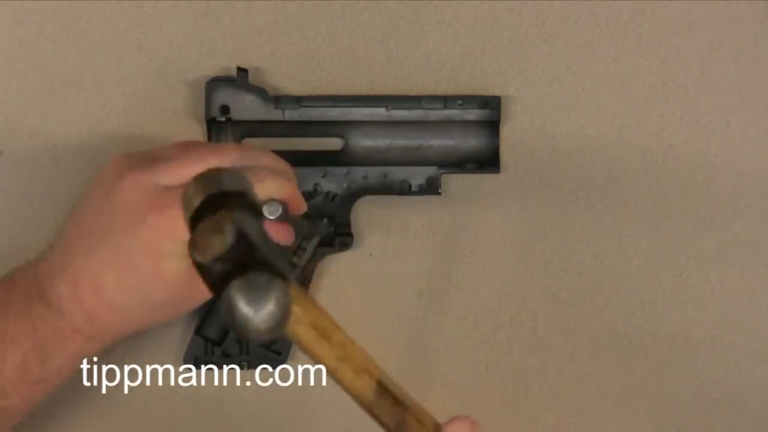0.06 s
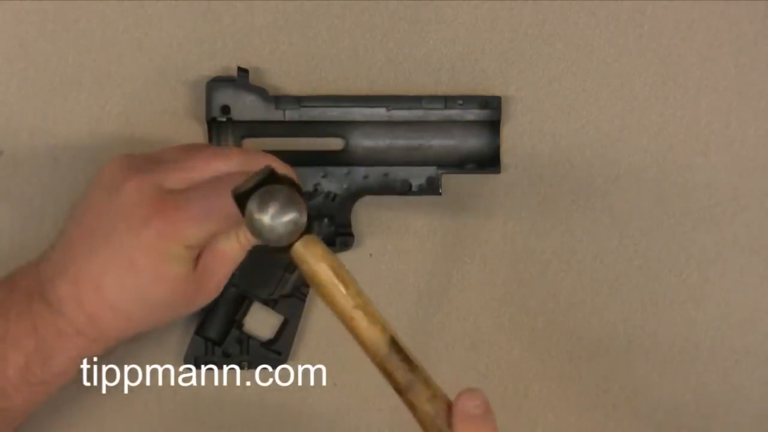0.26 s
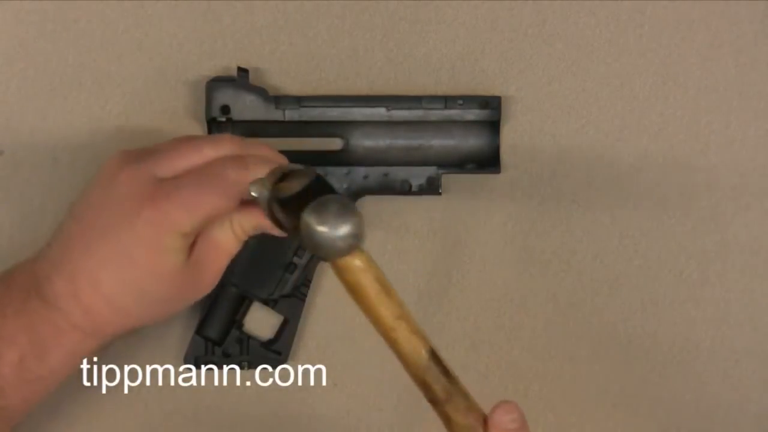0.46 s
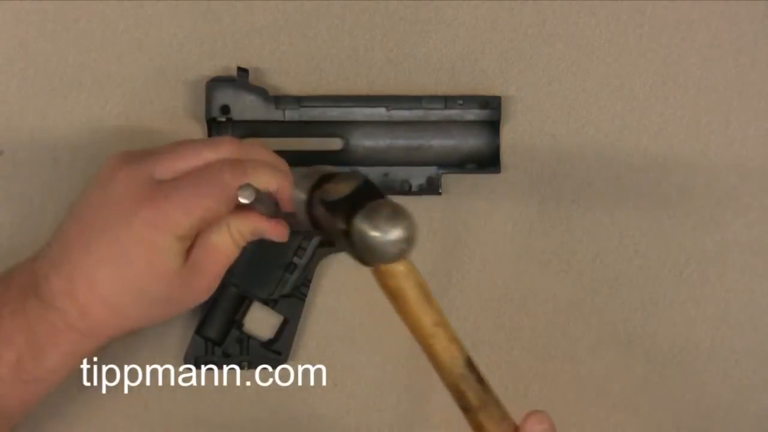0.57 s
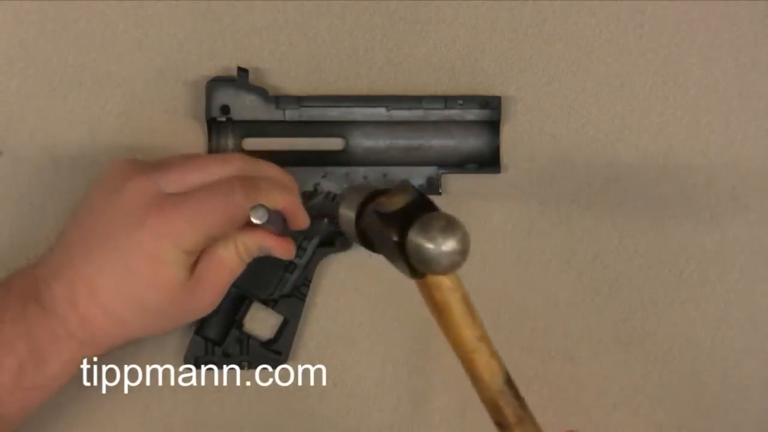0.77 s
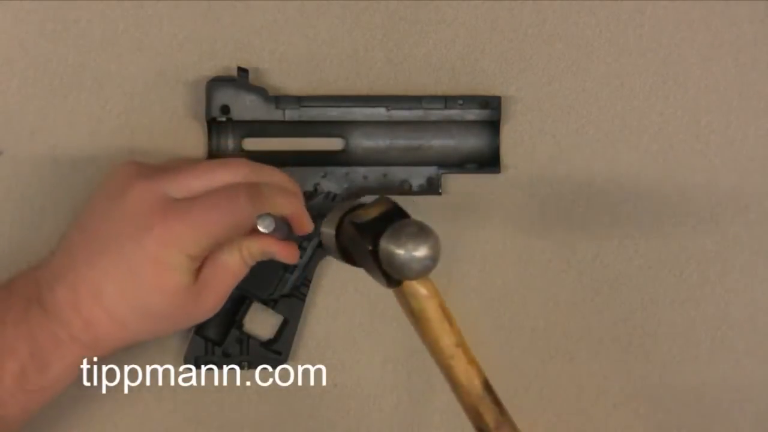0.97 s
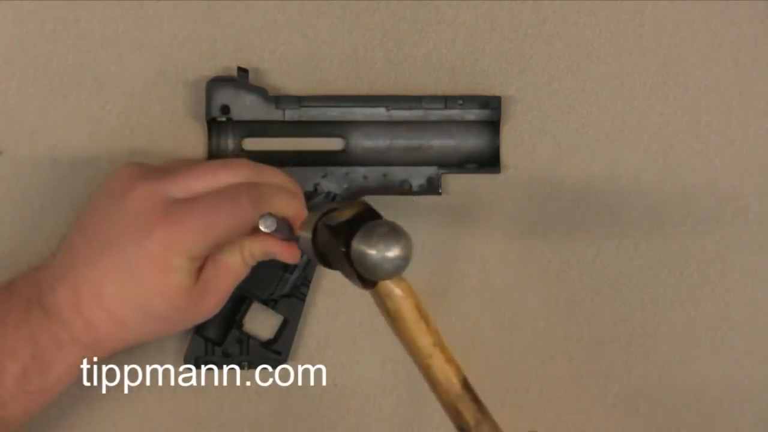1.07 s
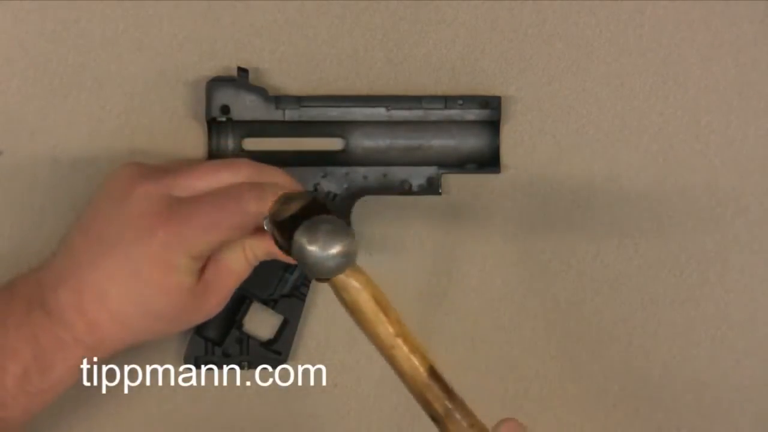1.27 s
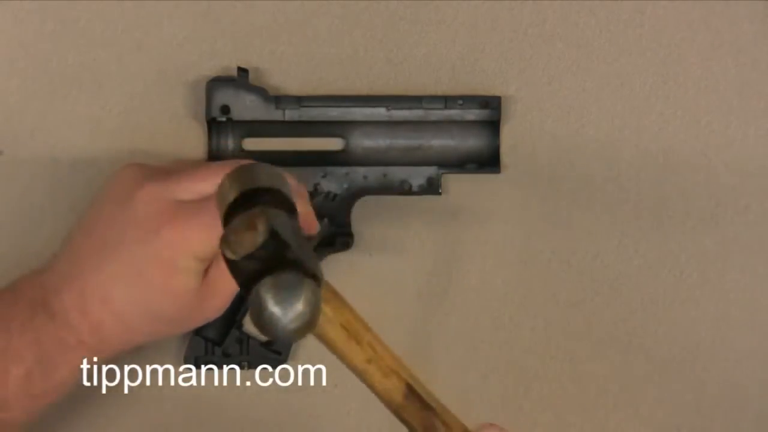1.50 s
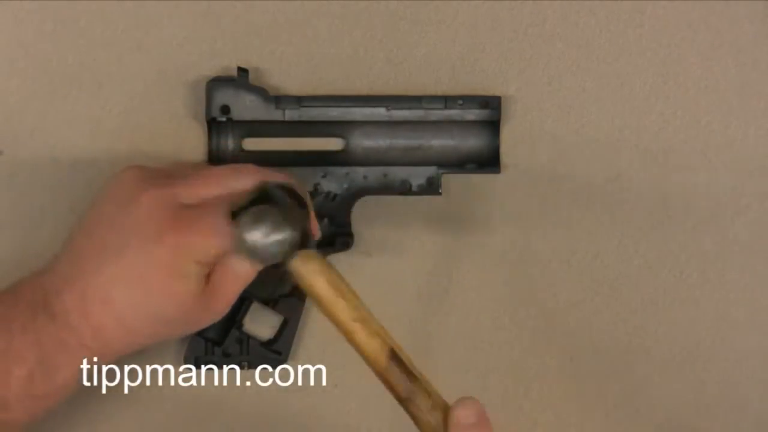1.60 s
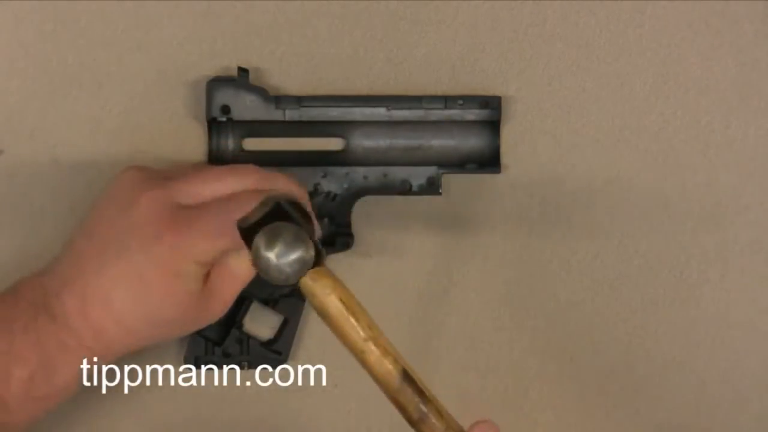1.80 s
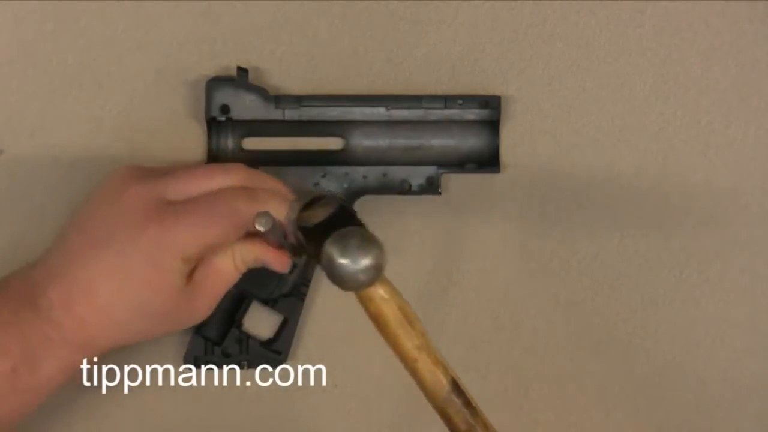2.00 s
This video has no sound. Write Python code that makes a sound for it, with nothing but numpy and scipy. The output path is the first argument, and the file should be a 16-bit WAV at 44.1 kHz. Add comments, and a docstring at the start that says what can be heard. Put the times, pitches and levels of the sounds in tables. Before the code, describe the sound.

Two hard, overloaded hammer blows on a steel punch, with faint knocks between, in a small room

```python
"""Over a steady room tone with wavering hums, a hammer strikes a steel punch on a metal casting on a workbench.
At 0.23 s noisy contact drives the steel modes, and slowly building bench modes and a small room ring on.
The blow overloads the recorder; its gain control cuts late and recovers. Light knocks of damped sines
follow at 0.93, 0.97 and 1.34 s, a second blow at 1.67 s and a last knock, mostly tick, at 1.93 s."""
import sys
import numpy as np
from scipy import signal
from scipy.fft import rfft, irfft
from scipy.io import wavfile
from scipy.ndimage import uniform_filter1d, minimum_filter1d

SR = 44100
rng = np.random.default_rng(int(sys.argv[2]) if len(sys.argv) > 2 else 0)


def materialize(psi):
    """Save the field psi as 16-bit PCM at rate SR to the path in sys.argv[1].

    A 1-D psi becomes a single channel; in a 2-D psi each row is a channel.
    """
    bounded = np.clip(np.atleast_2d(psi).T, -1, 1)
    quanta = np.round(bounded * 32767).astype(np.int16)
    wavfile.write(sys.argv[1], SR, quanta)


N = 90404


def amp(db):
    """Level definition: 20 dB is a factor of ten in amplitude."""
    return 10 ** (np.asarray(db) / 20)


def evened(x):
    """Normalization to unit root-mean-square value."""
    return x / np.sqrt(np.mean(x ** 2) + 1e-20)


def read(points, hz):
    """Linear interpolation of a curve along a logarithmic frequency axis."""
    f, value = np.transpose(points)
    return np.interp(np.log(hz + 1), np.log(f + 1), value)


def add(mix, s, sound):
    """Superposition of a sound on the mix from time s."""
    part = mix[round(s * SR):][:len(sound)]
    part += sound[:len(part)]


def ring(modes, t):
    """Modal superposition: exponentially damped sines from (Hz, dB, t60 s)."""
    return sum(amp(db - 60 * t / t60) * np.sin(2 * np.pi * hz * t) for hz, db, t60 in modes)


def causal(gain):
    """Minimum-phase principle: the Hilbert transform of log gain gives a causal impulse response."""
    log_gain = np.log(np.concatenate([gain, gain[-2:0:-1]]))
    return np.fft.ifft(np.exp(np.conj(signal.hilbert(log_gain)))).real


def pair(size, frames, same_table):
    """Partial coherence: random short-time spectra of two channels sharing a set part of their noise."""
    hz = np.fft.rfftfreq(size, 1 / SR)
    a, b, c, d = rng.standard_normal((frames, len(hz), 4)).T
    same = np.clip(read(same_table, hz), -1, 1)[:, None]
    left = a + 1j * b
    right = same * left + np.sqrt(1 - same ** 2) * (c + 1j * d)
    return hz, np.array([left, right])


# Room-tone spectrum, relative density: frequency_hz [Hz], density_db [dB per Hz]
AIR = [(15, -56), (25, -10.5), (43, -8.5), (121, -7.5), (213, -9), (286, -6), (326, -20.5), (363, -4.5),
       (394, -11.5), (558, -6.5), (856, -16), (11500, -44), (15000, -63.5)]
# Coherence of the room tone: frequency_hz [Hz], left_right_likeness [-1 to 1]
AIR_SAME = [(60, 0.63), (240, 0.05), (950, -0.5), (3770, -0.4), (15000, -0.31)]
# Wavering hums: pitch_hz [Hz], half_width_hz [Hz], level_db [dB]
HUM = [(55.7, 5.8, -64.5), (115, 18, -57), (154, 30, -60), (378, 19, -62)]
AIR_DB, PATCH_DB = -45.5, 1.0  # level of the wash; rms depth of its faint patches


def air():
    """Filtered noise: a broad spectrum gives the wash, narrow resonance curves give wavering hums."""
    def played(z):
        return evened(signal.istft(z, nperseg=4096, noverlap=3072)[1][:, :N])

    hz, z = pair(size=4096, frames=N // 1024 + 5, same_table=AIR_SAME)
    noise = rng.standard_normal(z.shape[:0:-1]).T
    patches = evened(uniform_filter1d(noise, size=30, axis=0))  # smoothed along frequency
    wash = amp(AIR_DB) * played(z * amp(read(AIR, hz)[:, None] + PATCH_DB * patches))
    for pitch, width, db in HUM:
        resonance = 1 / (1 + ((hz - pitch) / width) ** 2)[:, None]
        wash += amp(db) * played(z * resonance)
    return wash


LEAD_S = .005  # room for the contact noise to swell before the blow's start time
CRACK_T60 = .014  # s


def contact(rise, hold):
    """Impact excitation: noise grows exponentially, holds, then decays; gives mid and side parts."""
    u = np.arange(2048) / SR - LEAD_S
    growth = np.exp(np.minimum(u, 0) / rise)
    decay = amp(-60 * np.maximum(u - hold, 0) / CRACK_T60)
    return growth * decay * rng.standard_normal((2, 2048))


# Rattle of the contact, relative density: frequency_hz [Hz], density_db [dB per Hz]
CRACK = [(59, -40), (100, -17), (522, -5.5), (1170, -9.5), (3440, -8.5), (3820, -1), (4530, -11.5),
         (10100, -14), (15800, -33.5)]


def rattle(bright_db):
    """Linear filtering: an impulse response colours the contact noise, tilted towards the treble or bass."""
    hz = np.fft.rfftfreq(2048, 1 / SR)
    return evened(causal(amp(read(CRACK, hz) + bright_db * np.log2(1 + hz / 2000))))


# Modes of punch and casting: pitch_hz [Hz]
STEEL_HZ = [360, 510, 630, 980, 1390, 1570, 1880, 2360, 2640, 3000, 3780, 4740, 5760, 6270, 8100, 8750,
            9810]
# For each of them, relative levels: t60_s [s], first_blow_db [dB], second_blow_db [dB]
STEEL = [(.02, -14, -6.5), (.015, -12.5, -14), (0.0061, -8, -28), (0.026, -6.5, -27.5),
         (0.023, -10.5, -11.5), (.02, -12.5, -36), (0.045, -7, -8), (0.0068, -15, -1),
         (0.045, -13.5, -13.5), (0.026, -5.5, -7), (0.0077, -7, -40), (0.008, -5, -42), (0.002, -23, 7.5),
         (0.011, -1.5, -25), (.01, 0.5, -13.5), (.01, -10.5, -29), (0.029, -24, -1.5)]


def steel(index):
    """Modal response: the impulse response of punch and casting is a sum of damped sines."""
    t = np.arange(2048) / SR
    return evened(ring([(f, m[1 + index], m[0]) for f, m in zip(STEEL_HZ, STEEL)], t))


# Modes of the bench and things on it: pitch_hz [Hz]
BENCH_HZ = [81, 117, 188, 227, 255, 301, 347, 400, 460, 505, 560, 625, 1227, 1490, 1586, 1836, 1886, 1913,
            1951, 1990, 1680, 2035, 2242, 2363, 2487, 2929, 3408, 3736, 3881, 4037, 4304, 4650, 5690, 6008,
            8015, 9733]
# For each of them, relative levels: t60_s [s], first_blow_db [dB], second_blow_db [dB]
BENCH = [(0.64, -12, -11), (0.56, -5.5, -3.5), (0.6, -2, 3), (0.58, -5.5, -8), (0.13, -12.5, -8),
         (0.27, -13.5, -1), (0.44, -0.5, -6.5), (0.64, -9.5, -12), (.3, -8.5, -35.5), (.25, -11, -32.5),
         (0.51, -7, -15), (0.13, -5.5, -22), (0.62, -38, -14), (0.9, -26, -44.5), (0.83, -25.5, -14.5),
         (.7, -25.5, -19), (.7, -21, -17), (0.9, -18.5, -18), (.65, -21.5, -19.5), (.55, -26.5, -27.5),
         (.6, -34, -32), (.6, -31, -13), (.6, -27, -15), (0.48, -28.5, -16), (.6, -32.5, -25),
         (.6, -32, -27), (.6, -32.5, -34), (0.69, -30, -39.5), (0.51, -34.5, -36), (.6, -21.5, -39),
         (0.54, -30, -35), (.55, -35.5, -27), (.6, -41.5, -25), (0.55, -36, -40), (.45, -44, -28.5),
         (0.63, -44.5, -34.5)]
BENCH_RISE_CYCLES = 9.4  # time constant of the build-up
BENCH_WAVER, BENCH_SPREAD = 0.47, 0.27  # depth of each mode's swell: shared, and opposite left and right
BENCH_SHIMMER = .7  # depth of the quick flutter of the metal modes above 1 kHz


def bench(index):
    """Modal decay: modes build up over some cycles and die with random swells; gives left and right."""
    t = np.arange(SR) / SR
    shared, unlike = signal.resample(rng.standard_normal((2, len(BENCH), 50)), SR, axis=2)
    flutter = signal.resample(rng.standard_normal((len(BENCH), 200)), SR, axis=1)
    modes = np.array([ring([(f, m[1 + index], m[0])], t) * (1 - np.exp(-t * f / BENCH_RISE_CYCLES))
                      for f, m in zip(BENCH_HZ, BENCH)])
    modes *= 1 + BENCH_SHIMMER * flutter * (np.array(BENCH_HZ) > 1000)[:, None]
    return [(modes * (1 + BENCH_WAVER * shared + sign * BENCH_SPREAD * unlike)).sum(0) for sign in (1, -1)]


# Solid knock of casting on bench, relative levels:
# pitch_hz [Hz], t60_s [s], first_blow_db [dB], second_blow_db [dB]
THUMP = [(380, .03, -10, -24), (520, .015, -9, -24), (644, .015, -6, -6), (800, 0.027, -12, -12.5)]
THUMP_DELAY_S = 0.00082


def thump(index):
    """Strong damping: a few short-lived modes sound as one solid knock of the casting against the bench."""
    return ring([(m[0], m[2 + index], m[1]) for m in THUMP], np.arange(4096) / SR)


# Hammer blows, relative levels: start_s [s], level_db [dB], rise_s [s], hold_s [s],
# bench_level_db [dB], brightness_db [dB per octave, well above 2 kHz]
BLOWS = [(.2272, 10, 0.00072, 0.0043, -13.5, -2), (1.6718, 10, 0.00044, 0.0049, -14, -1)]
RATTLE_DB, STEEL_DB, ECHO_STEEL_DB = -13, -14.5, -18  # the last for the steel as fed to the walls
CRACK_SIDE_DB = -16  # part of the rattle that differs between the channels


def blow(index, db, rise, hold, bench_db, bright_db):
    """Source and resonator: contact noise convolved with the body; gives left, right and wall feed."""
    mid, side = contact(rise, hold)
    rattle_body = amp(RATTLE_DB) * rattle(bright_db)
    steel_body = steel(index)
    body = rattle_body + amp(STEEL_DB) * steel_body
    ringing, knocking = bench(index), thump(index)
    out = np.zeros((3, SR))
    for k, sign in enumerate((1, -1)):
        push = mid + sign * amp(CRACK_SIDE_DB) * side
        add(out[k], 0, signal.fftconvolve(push, body) / np.linalg.norm(mid))
        add(out[k], LEAD_S, amp(bench_db) * ringing[k])
        add(out[k], LEAD_S + THUMP_DELAY_S, knocking)
    add(out[2], LEAD_S, rattle_body + amp(ECHO_STEEL_DB) * steel_body)
    return amp(db) * out


# Reverberation time: frequency_hz [Hz], t60_s [s]
ROOM_T60 = [(80, .5), (200, 0.65), (500, 0.49), (1000, 0.41), (2000, 0.53), (3000, 0.51), (4500, 0.58),
            (7000, 0.42), (10000, 0.29), (14000, .2)]
# Colour of the reflections, relative: frequency_hz [Hz], level_db [dB]
ROOM_COLOUR = [(80, 14.5), (200, 11.5), (500, 6), (1000, 1), (2000, 5), (4000, -7), (7000, -2.5),
               (10000, -2), (14000, -10.5)]
# Coherence of the reflections: frequency_hz [Hz], left_right_likeness [-1 to 1]
ROOM_SAME = [(60, 0.55), (500, 1), (1000, 1), (2000, 0.45), (4000, 0.45), (10000, 0.098)]
ROOM_DB, ROOM_DELAY_S = -6.5, .004


def room(x):
    """Statistical reverberation: dense random reflections, each band decaying at its own rate."""
    hz, z = pair(size=512, frames=SR * 3 // 2 // 128, same_table=ROOM_SAME)
    t = np.arange(z.shape[2]) * 128 / SR
    level_db = read(ROOM_COLOUR, hz)[:, None] - 60 * t / read(ROOM_T60, hz)[:, None]
    tail = signal.istft(z * amp(level_db), nperseg=512, noverlap=384)[1]
    tail = np.pad(tail, ((0, 0), (round(ROOM_DELAY_S * SR), 0)))
    return amp(ROOM_DB) * signal.fftconvolve(x[None], tail / np.linalg.norm(tail[0]), axes=1)[:, :N]


# Light knocks: start_s [s], thud_db [dB], tick_db [dB]
KNOCKS = [(0.930, -25.5, -40), (0.968, -36, -55), (1.336, -58, -80), (1.925, -67, -34)]
# Modes of the thud, relative levels: pitch_hz [Hz], level_db [dB], t60_s [s]
KNOCK_MODES = [(162.6, -2, 0.07), (243, -6, 0.073), (350, 1.5, 0.063), (401, -10, 0.098), (586, -21, .06)]
# Modes of the steel tick, relative levels: pitch_hz [Hz], level_db [dB], t60_s [s]
TICK_MODES = [(2290, 2, 0.03), (2998, -1, 0.075), (3610, -5, 0.045), (4860, -7, 0.035), (5750, -8, 0.015),
              (6150, -8, 0.025), (8050, -11, .012)]
KNOCK_RISE_S = 0.0011  # time constant
ECHO_KNOCK_DB = -6.5  # knock as fed to the walls


def knock(thud_db, tick_db):
    """Modal excitation with a softened onset: a thud of the bench and a small steel tick."""
    t = np.arange(SR // 2) / SR
    rise = 1 - np.exp(-t / KNOCK_RISE_S)
    thud = amp(thud_db) * ring(KNOCK_MODES, t)
    tick = amp(tick_db) * ring(TICK_MODES, t)
    return rise * (thud + tick)


def scene():
    """Superposition of direct sound, reverberation and room tone."""
    hits = np.zeros((3, N))  # left, right, feed of the walls
    for k, (s, *row) in enumerate(BLOWS):
        add(hits.T, s - LEAD_S, blow(k, *row).T)
    for s, thud_db, tick_db in KNOCKS:
        add(hits.T, s, knock(thud_db, tick_db)[:, None] * [1, 1, amp(ECHO_KNOCK_DB)])
    return hits[:2] + room(hits[2]) + air()


GAIN_START_DB, GAIN_SHARE, GAIN_DEEPEST_DB = -10, 1.0, 14  # threshold, dB of cut per dB above it, limit
GAIN_FALL_S, GAIN_HOLD_S, GAIN_RECOVER_DB_PER_S = 0.0019, .11, 75  # fall is a time constant


def gain_control(x):
    """Feedback-free compression: smoothed power, held a while, sets a cut that falls late for the crack."""
    r = np.exp(-1 / (GAIN_FALL_S * SR))
    power_db = 10 * np.log10(signal.lfilter([1 - r], [1, -r], (x ** 2).mean(0)) + 1e-12)
    hold = round(GAIN_HOLD_S * SR) // 2 * 2 + 1
    held_db = -minimum_filter1d(-power_db, size=hold, origin=hold // 2)  # highest recent level
    wanted_db = np.clip(GAIN_SHARE * (held_db - GAIN_START_DB), 0, GAIN_DEEPEST_DB)
    recovery = np.arange(N) * GAIN_RECOVER_DB_PER_S / SR
    cut_db = np.maximum.accumulate(wanted_db + recovery) - recovery
    return x / amp(signal.lfilter([1 - r], [1, -r], cut_db))


# Microphone balance: frequency_hz [Hz], left_minus_right_db [dB]
BALANCE_DB = [(40, 3.5), (240, -0.14), (950, -0.05), (3770, 0), (12000, 0.5)]
LOW_CUT_HZ, EDGE_HZ = 68, 15950  # band limits


def record(dry):
    """Nonlinear transduction: channel balance, gain control, steep saturation, then band limits."""
    tilt = amp(read(BALANCE_DB, np.fft.rfftfreq(N, 1 / SR)) / 2)
    ducked = gain_control(irfft(rfft(dry) * [tilt, 1 / tilt], N))
    clipped = 0.88 * np.tanh(ducked ** 3 + ducked)
    low_cut = signal.lfilter(*signal.butter(2, LOW_CUT_HZ, "high", fs=SR), clipped)
    low_pass = signal.firwin(511, EDGE_HZ, window=("kaiser", 9), fs=SR)
    padded = np.pad(low_cut, ((0, 0), (255, 255)), "reflect")
    return signal.oaconvolve(padded, low_pass[None], "valid")


dry = scene()
out = record(dry)
materialize(out)
```